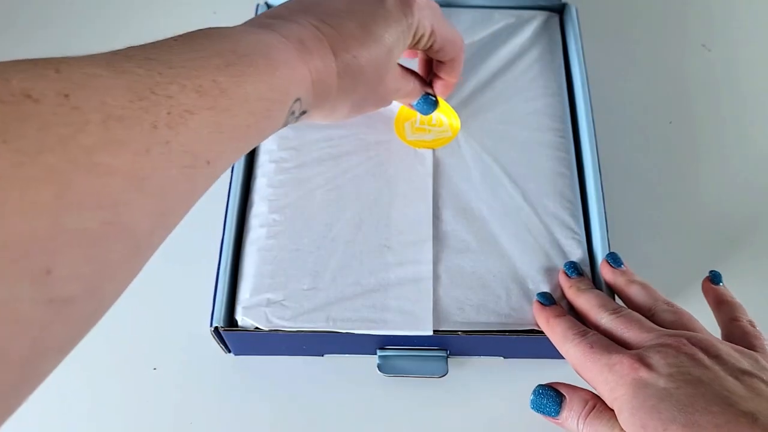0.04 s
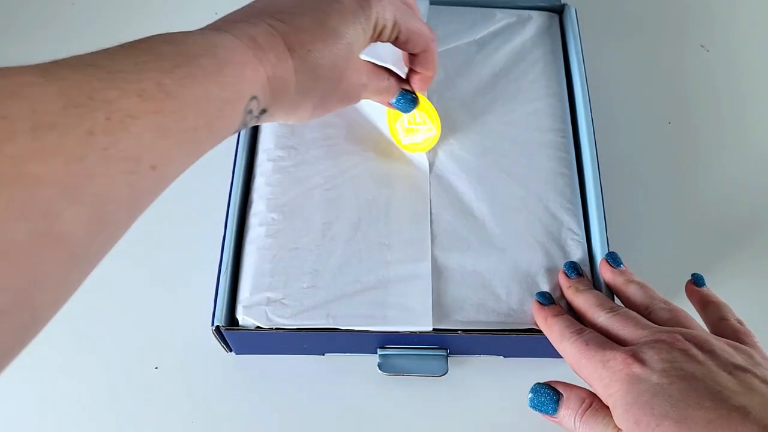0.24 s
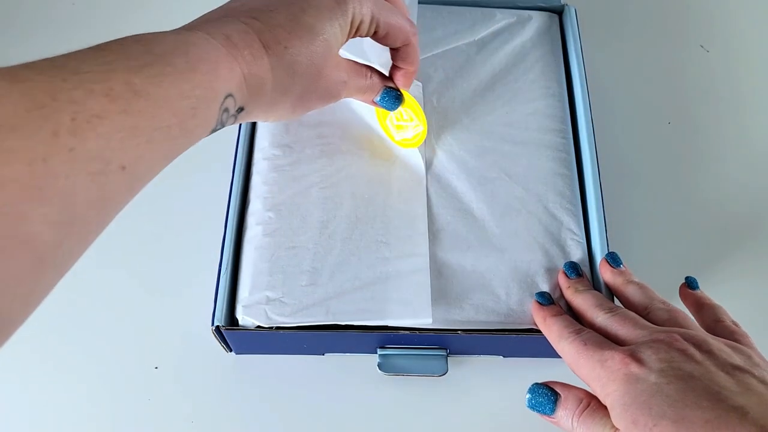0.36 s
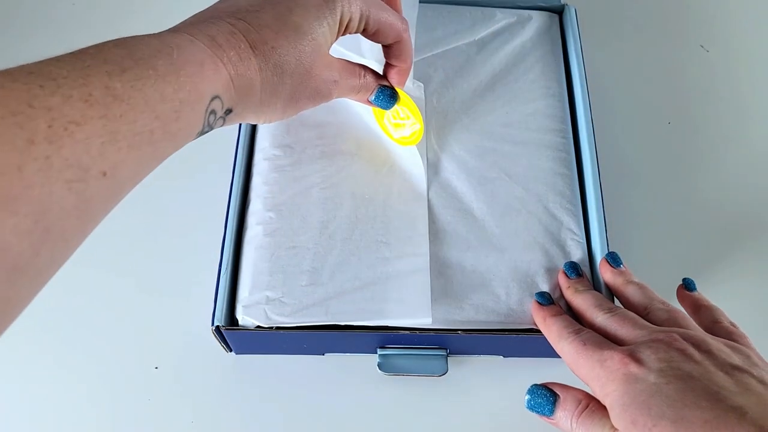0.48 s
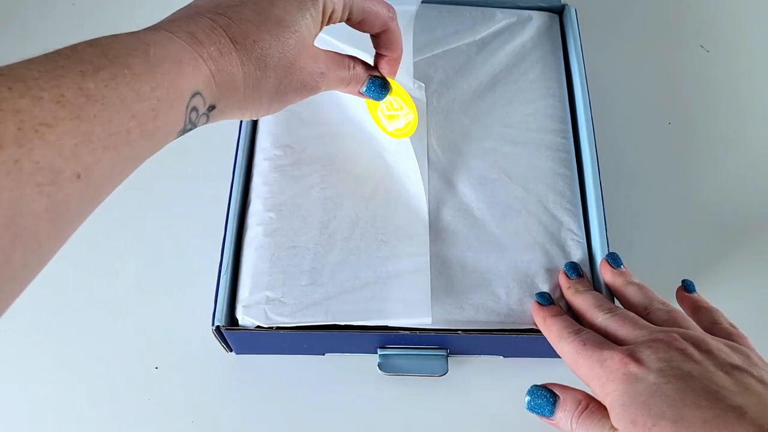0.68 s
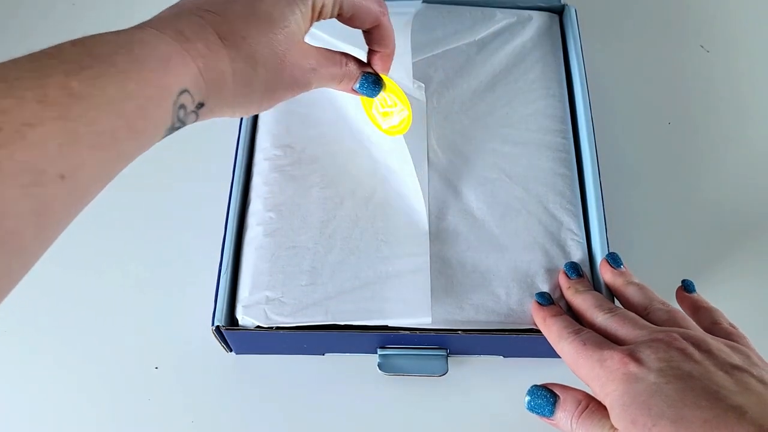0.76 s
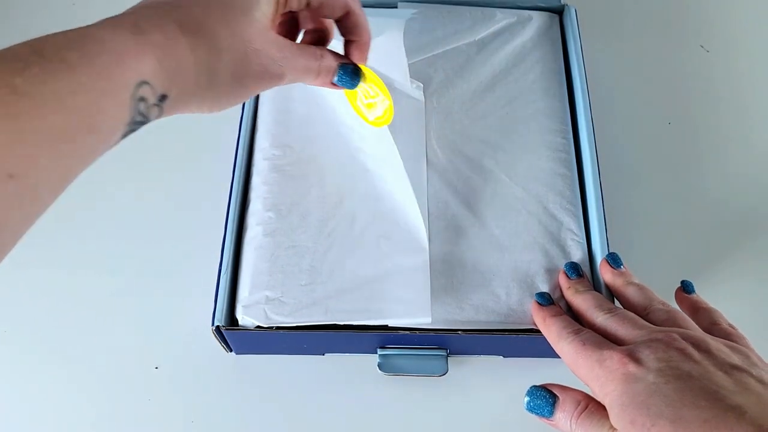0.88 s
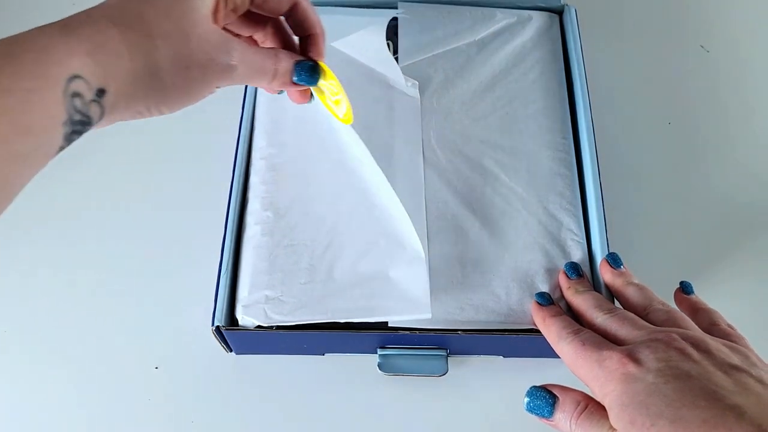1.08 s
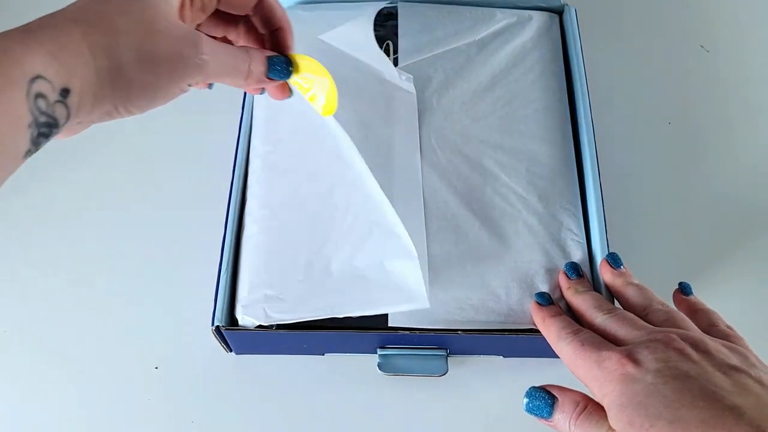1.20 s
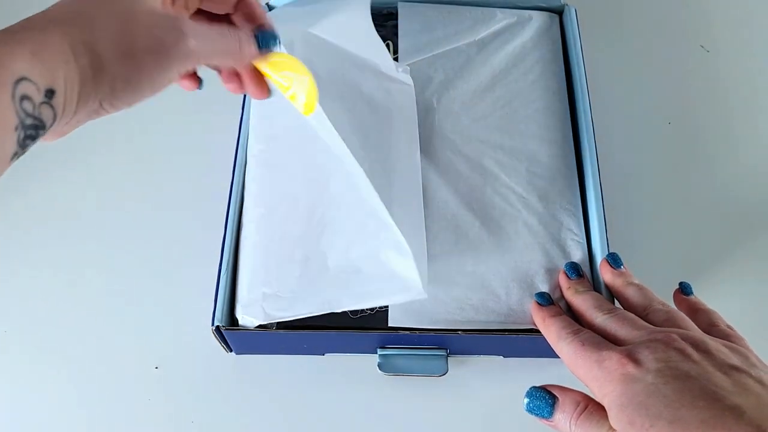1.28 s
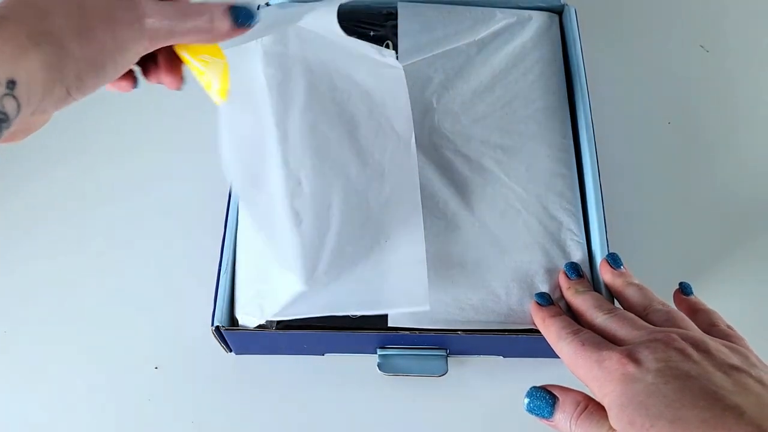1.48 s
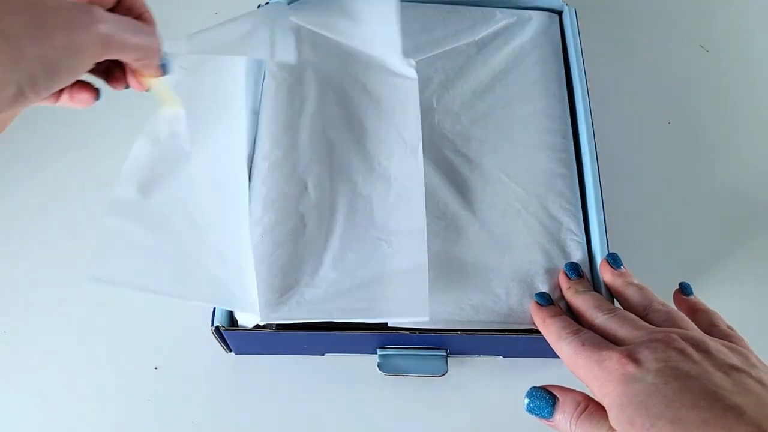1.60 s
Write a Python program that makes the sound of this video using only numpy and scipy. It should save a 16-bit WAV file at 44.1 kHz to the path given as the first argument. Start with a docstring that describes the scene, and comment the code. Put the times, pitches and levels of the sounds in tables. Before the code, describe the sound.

Tissue paper crinkles close to a stereo microphone in a small quiet room. Peeling rustle builds until a sticker seal lets go at about 0.31 to 0.33 seconds, with loud sharp clicks, a brief card-box ring and a faint low thump. Sparse, quieter tugging and crease snaps follow; from 0.8 lifting crackles grow, peaking near 1.07. At 1.3 the sheet flips, billows and rustles back until the end.

```python
"""Tissue paper in a shallow card box on a table in a small room, close to a stereo microphone.
A sticker seal peels while the sheet is tugged: rustle of random crackles over sliding hiss.
Creases snap throughout, as noise volleys that each ring a facet of the sheet, over shaped noise of still air.
The seal lets go in sharp clicks that ring the box (decaying sines) with a soft thump (a swelling sine).
The tugging goes on, then the sheet is lifted, flips up and billows as it folds back, rustling the same way."""
import sys
import numpy as np
from scipy import signal
from scipy.fft import rfft, irfft
from scipy.io import wavfile

SR = 44100
rng = np.random.default_rng(int(sys.argv[2]) if len(sys.argv) > 2 else 0)


def dump(signal):
    """Clip the signal to [-1, 1] and save it as 16-bit WAV at the path in sys.argv[1]."""
    limited = np.clip(np.atleast_2d(signal).T, -1, 1)
    pcm = np.round(limited * 32767).astype(np.int16)
    wavfile.write(sys.argv[1], SR, pcm)


N = 72765  # length [samples]

# Alikeness of left and right at the microphone: (frequency [Hz], correlation [-1 to 1])
LEFT_RIGHT_LIKENESS = [(100, 0.7), (500, 0.12), (6000, 0)]
# Colour of the still air: (frequency [Hz], relative level [dB])
AIR_COLOUR = [(70, -8), (200, -5), (15500, -15.5)]
# Rustle of each move of the hand, before the room: (time [s], level [dB])
PEEL_LEVEL = [(0, -46.5), (.095, -59), (.122, -48.5), (.155, -56.5), (.175, -45.5), (.226, -47.5),
              (.288, -39.5), (.305, -36), (.318, -36.5), (.326, -35.5), (.338, -40.5), (.365, -52.5)]
TUG_LEVEL = [(0, -52.5), (.17, -53), (.39, -44.5), (.415, -52.5), (.445, -45.5), (.465, -57.5), (.63, -53),
             (.745, -54.5), (.765, -64)]
LIFT_LEVEL = [(.797, -62.5), (.81, -51), (.865, -53), (.89, -48.5), (.955, -51.5), (.995, -48.5),
              (1.012, -41.5), (1.048, -48), (1.072, -38), (1.095, -50.5), (1.138, -55), (1.156, -44),
              (1.205, -61), (1.28, -59)]
FLIP_LEVEL = [(1.291, -64), (1.297, -41), (1.314, -39), (1.326, -47.5)]
FOLD_LEVEL = [(1.293, -65), (1.298, -44), (1.345, -48.5), (1.378, -35.5), (1.41, -44), (1.455, -46),
              (1.47, -42), (1.505, -45.5), (1.65, -45.5)]
BILLOW_LEVEL = [(1.365, -53.5), (1.44, -47), (1.48, -50.5), (1.50, -62)]
# Colours of the rustle; the crease colour serves both tug and snaps: (frequency [Hz], relative level [dB])
PEEL_COLOUR = [(170, -28), (300, 0), (750, 1.5), (1500, 3.5), (2200, -10), (2850, 10.5), (3200, -2.5),
               (3900, 8), (4500, -3), (15500, -11.5)]
CREASE_COLOUR = [(220, -23), (1600, 1.5), (2200, -1.5), (2800, 5.5), (3400, -1), (8000, -4), (15500, -9)]
LIFT_COLOUR = [(170, -35), (320, -5.5), (800, -4.5), (1900, 0.5), (3900, 1), (15500, -11)]
FLIP_COLOUR = [(200, -22.5), (700, -5.5), (3300, -1), (5200, -7), (15500, -18.5)]
FOLD_COLOUR = [(200, -25), (550, -1.5), (8400, 0), (15500, -6.5)]
BILLOW_COLOUR = [(200, -23.5), (620, -1), (1200, -2.5), (6000, -15)]
# Modes of the box and the taut sheet: (frequency [Hz])
BOX_MODES = [308, 352.5, 555, 690, 750, 809.6, 872, 1005.5, 1159, 1283, 1617]
# Crease snaps: (time [s], level [dB], tilt [dB per octave], ring of the buckling facet [Hz])
CREASE_SNAPS = [(0.0373, -39, 1.5, 3570), (0.0508, -41, -1.5, 8550), (0.232, -34, 3, 7000),
                (0.2902, -38, -3, 3900), (0.3342, -29, 4, 5800), (0.3851, -39.5, -1, 5250),
                (0.429, -36.5, -0.5, 2570), (0.4339, -37, -3, 1330), (0.482, -43.5, -0.5, 2300),
                (0.502, -43, -0.5, 3040), (0.509, -43, -1, 4800), (0.5889, -39, 2.5, 7900),
                (0.6974, -44, -3.5, 2630), (.729, -41.5, 0.5, 11900), (0.7911, -47, -2, 5100),
                (0.8231, -40, 2, 6270), (0.8523, -36, 1.5, 4070), (0.896, -38, 2, 4800),
                (0.9256, -36, 0, 3740), (.97, -37, 3, 13800), (1.0179, -39, -1, 7100),
                (1.0671, -32.5, 3.5, 3450), (1.081, -35.5, 5, 13400), (1.1007, -36.5, 5, 6000),
                (1.224, -44, -0.5, 13400), (1.2526, -43, -0.5, 6000), (1.3078, -33, -4, 3500),
                (1.3613, -36.5, 7.5, 1900), (1.4217, -40, 4, 900), (1.5708, -36.5, -9.5, 3300)]
# The seal lets go: (time [s], level [dB], tilt [dB per octave])
SEAL_POPS = [(0.3118, -21.5, -.5), (0.3148, -32, 5), (.328, -21, -0.5)]
# Colour of the pops: (frequency [Hz], relative level [dB])
POP_COLOUR = [(40, -38), (350, -6.5), (760, 12.5), (2100, -3.5), (3900, 1), (5000, -3), (6200, -1.5),
              (7400, -16), (10500, -12.5), (12500, -6), (15500, -14)]

AIR_DB = -67.5
CRACKLES_PER_S = 380  # mean rate
FLUTTER_DB, FLUTTER_HZ = 1.5, 59.54  # spread of the hiss level, random points per second
VOLLEY_LEAD_S, VOLLEY_RISE_S, VOLLEY_SHAPE = .0015, .0008, 1.02  # silence ahead, time to peak, exponent
RUSTLE_PATCHY_DB, SNAP_PATCHY_DB, PATCH_HZ = 5.5, 3.5, 894  # spectral unevenness and its spacing
FACET_DB, FACET_OCTAVES = 9.5, 0.14  # height and width of a facet's resonance
BOX_T60_S = 0.12
BOX_POP_DB, BOX_RUSTLE_DB = -8, -20  # box ring relative to the pop, gain of its answer to the rustle
POP_DECAY_S, POP_SCATTER_DB, POP_LAG_S = .0009, 5, .00004  # fibre decay, fibre gain, right channel's lag
THUMP_S, THUMP_HZ, THUMP_DB, THUMP_SWELL_S = .318, 84.3, -51, 0.015  # start, pitch, peak, time to peak
ROOM_DB, ROOM_T60_S, ROOM_TREBLE_T60_S = -13, 0.21, 0.087
EARLY_DB, EARLY_S = -5.5, 0.0055  # early echoes: gain, time to fall to 1/e
TOP_HZ = 16100


def undb(db):
    """Decibels to amplitude gain."""
    return 10 ** (np.asarray(db) / 20)


def unit(x):
    """Scale to rms 1."""
    return x / np.sqrt(np.mean(x ** 2))


def energy(x):
    """Scale each channel to energy 1."""
    return x / np.sqrt(np.sum(x ** 2, axis=-1, keepdims=True))


def t60_decay(t, t60_s):
    """Exponential fall of 60 dB in the given time."""
    return np.exp(-np.log(1000) * t / t60_s)


def over_hz(points, size):
    """Spread (Hz, value) points over the bins of a transform, along log frequency."""
    hz, value = np.array(points, float).T
    bin_hz = np.fft.rfftfreq(size, 1 / SR)
    return np.interp(np.log(bin_hz + 1), np.log(hz), value)


def response(colour, tilt=0, ring_hz=None, size=2048):
    """Minimum-phase impulse response of a colour, tilted in dB per octave, with an optional facet ring."""
    bins = np.arange(size // 2 + 1)
    # the tilt works only above about 1.6 kHz
    db = over_hz(colour, size) + tilt * np.log2(np.maximum(bins, size // 28))
    if ring_hz:
        octaves_off = np.log2((bins * SR / size + 1) / ring_hz)
        db = db + FACET_DB * np.exp(-.5 * (octaves_off / FACET_OCTAVES) ** 2)
    # folding the cepstrum forward makes the response causal
    cepstrum = irfft(np.log(undb(db)))
    cepstrum[1:size // 2] *= 2
    cepstrum[size // 2 + 1:] = 0
    return energy(irfft(np.exp(rfft(cepstrum))))


def through(x, ir):
    """Convolve, keeping the length."""
    return signal.fftconvolve(x, np.atleast_2d(ir), axes=-1)[:, :x.shape[1]]


def add(out, start_s, x):
    """Mix a short sound in at its time."""
    i = int(np.clip(start_s * SR, 0, N - 1))
    out[:, i:i + x.shape[1]] += x[:, :N - i]


def strike(db, x):
    """Set a short sound to its level, its energy taken over 2.5 ms."""
    return undb(db) * energy(x) * np.sqrt(SR * .0025)


def stereo(x):
    """Blend two unrelated signals into left and right: alike in the bass, apart in the treble."""
    size = x.shape[1]
    likeness = np.clip(over_hz(LEFT_RIGHT_LIKENESS, size), -1, 1)
    mid, side = rfft(x) * np.sqrt([(1 + likeness) / 2, (1 - likeness) / 2])
    return irfft(np.array([mid + side, mid - side]), size)


def walk(hz):
    """Random wander of rms 1, joining random points with straight lines."""
    points = rng.standard_normal(N)
    return unit(np.interp(np.arange(N) / SR * hz, np.arange(N), points))


def still_air():
    """Steady shaped noise of the quiet room."""
    noise = stereo(rng.standard_normal((2, N)))
    return undb(AIR_DB) * unit(through(noise, response(AIR_COLOUR)))


def buckles(count, patchy_db, size=512):
    """Each flip of the sheet is a volley of tiny clicks, milliseconds long, with its own broad resonances."""
    age = np.maximum(np.arange(size) / SR - VOLLEY_LEAD_S, 0) / VOLLEY_RISE_S
    chance = rng.standard_normal((count, 3, size))
    volleys = chance[:, :2] * (age * np.exp(-age)) ** VOLLEY_SHAPE
    place = np.fft.rfftfreq(size, 1 / SR) / PATCH_HZ
    patches = np.array([np.interp(place, np.arange(size), row) for row in chance[:, 2]])
    return energy(irfft(rfft(volleys) * undb(patchy_db * patches)[:, None]))


def crackles(spread_db=2.5, count=1600):
    """Tiny creases buckle at random moments with random strengths."""
    gap, strength = rng.exponential(size=(count, 2)).T
    times = np.cumsum(gap) / CRACKLES_PER_S
    strength = np.minimum(strength, 3.5)
    out = np.zeros((2, N))
    for time_s, power, grain in zip(times, strength, buckles(count, RUSTLE_PATCHY_DB)):
        if time_s < N / SR:
            add(out, time_s, undb(spread_db * power) * grain)
    return out


def rustle(curve, colour, slide_db):
    """Crackles over the fluttering hiss of paper sliding on paper, following one move of the hand."""
    slide = rng.standard_normal((2, N)) * undb(FLUTTER_DB * walk(FLUTTER_HZ))
    mix = unit(crackles()) + undb(slide_db) * unit(slide)
    paper = unit(through(stereo(mix), response(colour)))
    times, db = np.array(curve).T
    t = np.arange(N) / SR
    # the move fades exponentially before its first and after its last point
    outside_s = np.maximum(times[0] - t, 0) + np.maximum(t - times[-1], 0)
    return paper * undb(np.interp(t, times, db)) * np.exp(-outside_s / 0.033)


def box():
    """Ring of the card box and the sheet stretched over it: decaying sines, random phase per channel."""
    t = np.arange(N // 3) / SR
    ring = sum(np.sin(2 * np.pi * hz * t + rng.standard_normal((2, 1))) for hz in BOX_MODES)
    return energy(ring * t60_decay(t, BOX_T60_S))


def snaps():
    """Creases buckle one by one, each ringing its own facet of the sheet."""
    out = np.zeros((2, N))
    volleys = buckles(len(CREASE_SNAPS), SNAP_PATCHY_DB, size=2048)
    for (time_s, db, tilt, ring_hz), volley in zip(CREASE_SNAPS, volleys):
        snap = through(stereo(volley), response(CREASE_COLOUR, tilt, ring_hz))
        # start early so that the volley swells to its peak at the given time
        add(out, time_s - VOLLEY_LEAD_S - VOLLEY_RISE_S, strike(db, snap))
    return out


def pop(tilt):
    """One hard click that reaches left and right almost together, trailed by tearing fibres."""
    click = response(POP_COLOUR, tilt)
    t = np.arange(len(click)) / SR
    late_click = np.interp(t - POP_LAG_S, t, click, left=0)
    fibres = energy(rng.standard_normal((2, len(t))) * np.exp(-t / POP_DECAY_S))
    return np.array([click, late_click]) + undb(POP_SCATTER_DB) * through(fibres, click)


def thump():
    """The slackening sheet pushes a soft thump of air: a low sine that swells and dies."""
    t = np.arange(N // 2) / SR
    age = t / THUMP_SWELL_S
    swell = (age * np.exp(1 - age)) ** 2
    return undb(THUMP_DB) * np.atleast_2d(np.sin(2 * np.pi * THUMP_HZ * t) * swell)


def seal():
    """The sticker pops free, each pop rings the box, and the sheet thumps the air."""
    out = np.zeros((2, N))
    for time_s, db, tilt in SEAL_POPS:
        add(out, time_s, strike(db, pop(tilt)))
        add(out, time_s, strike(db + BOX_POP_DB, box()))
    add(out, THUMP_S, thump())
    return out


def room(x):
    """Early echoes from table and box, then a short tail whose treble dies first."""
    t = np.arange(N // 3) / SR
    early, low, high = rng.standard_normal((3, 2, len(t)))
    low = signal.sosfilt(signal.butter(2, 4000, fs=SR, output="sos"), low)
    high = signal.sosfilt(signal.butter(2, 4000, "high", fs=SR, output="sos"), high)
    tail = low * t60_decay(t, ROOM_T60_S) + high * t60_decay(t, ROOM_TREBLE_T60_S)
    tail = tail * (t > .005)
    early = early * np.exp(-t / EARLY_S) * (t > .001)
    return x + through(x, undb(EARLY_DB) * energy(early) + undb(ROOM_DB) * energy(tail))


def scene():
    """Rustle, creases and seal in the room, over still air; the rustle stirs the box faintly."""
    sheet = rustle(PEEL_LEVEL, PEEL_COLOUR, slide_db=-6)
    sheet += rustle(TUG_LEVEL, CREASE_COLOUR, slide_db=-8)
    sheet += rustle(LIFT_LEVEL, LIFT_COLOUR, slide_db=-10.5)
    sheet += rustle(FLIP_LEVEL, FLIP_COLOUR, slide_db=-2)
    sheet += rustle(FOLD_LEVEL, FOLD_COLOUR, slide_db=-7)
    sheet += rustle(BILLOW_LEVEL, BILLOW_COLOUR, slide_db=-4)
    stirred_box = undb(BOX_RUSTLE_DB) * through(sheet, box())
    paper = sheet + stirred_box + snaps() + seal()
    return room(paper) + still_air()


def record(dry):
    """The recorder cuts the top with a steep low-pass."""
    return signal.sosfilt(signal.ellip(10, .2, 80, TOP_HZ, fs=SR, output="sos"), dry)


dry = scene()
out = record(dry)
dump(out)
```